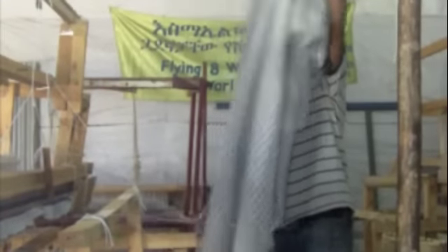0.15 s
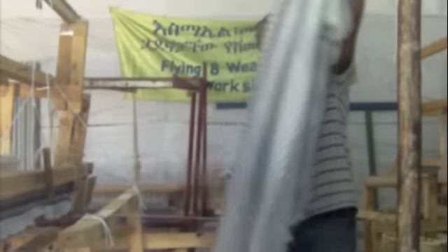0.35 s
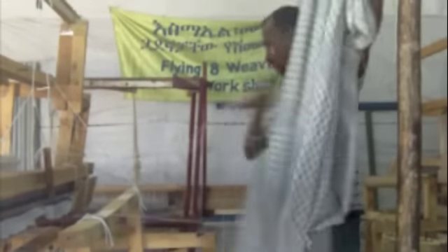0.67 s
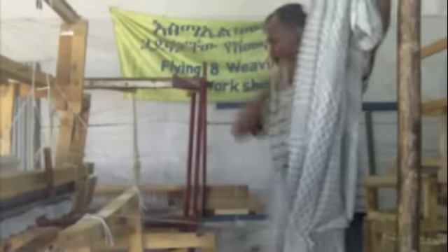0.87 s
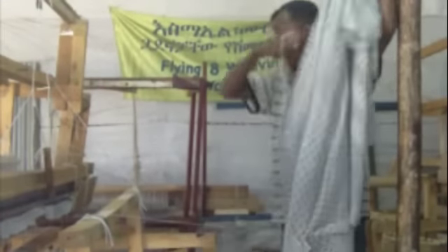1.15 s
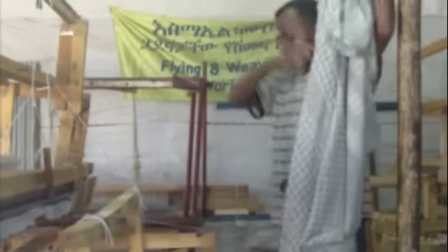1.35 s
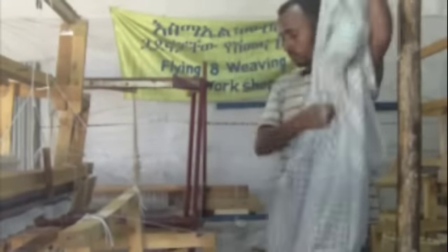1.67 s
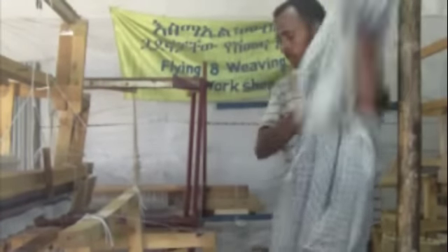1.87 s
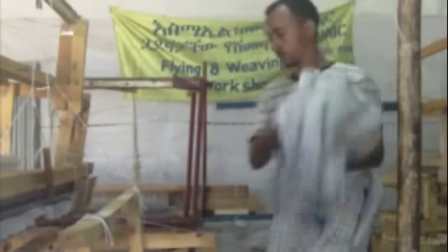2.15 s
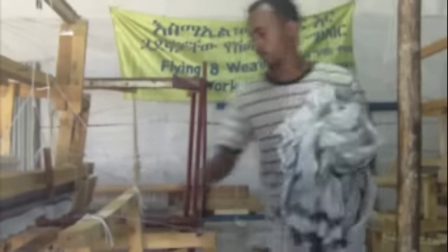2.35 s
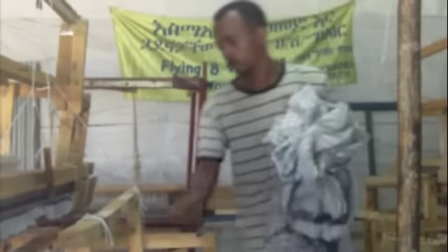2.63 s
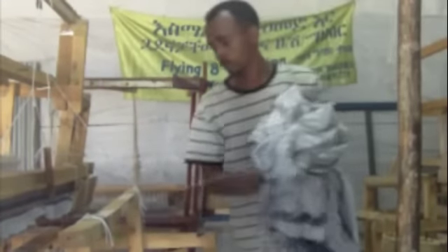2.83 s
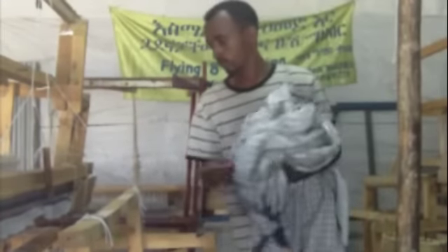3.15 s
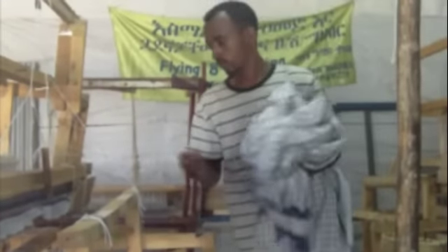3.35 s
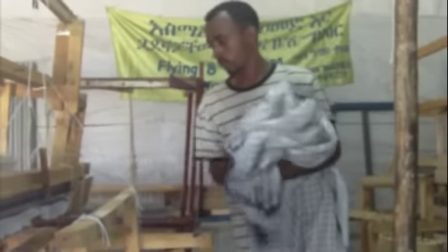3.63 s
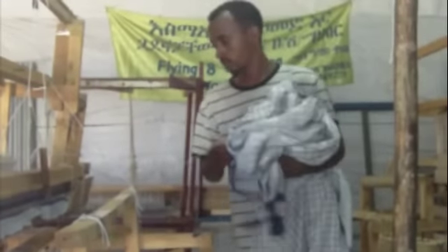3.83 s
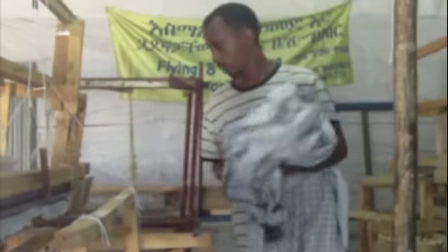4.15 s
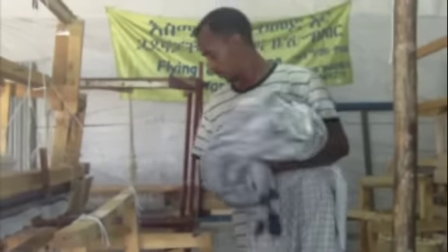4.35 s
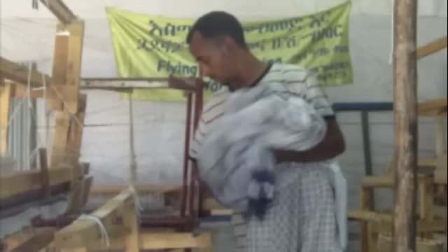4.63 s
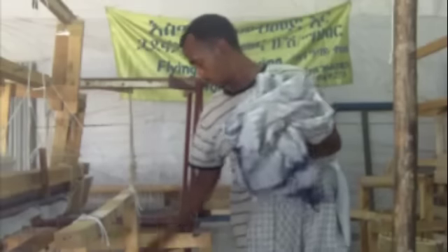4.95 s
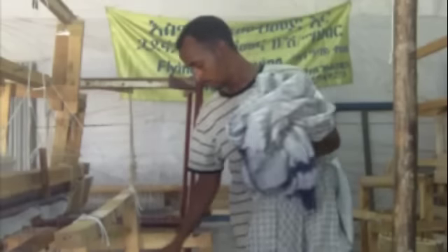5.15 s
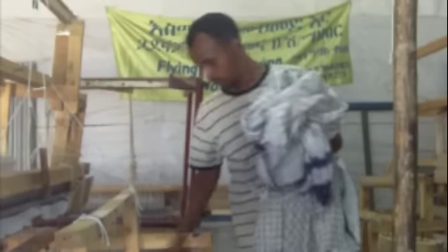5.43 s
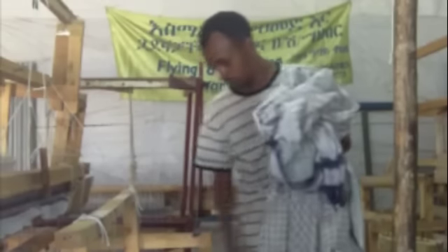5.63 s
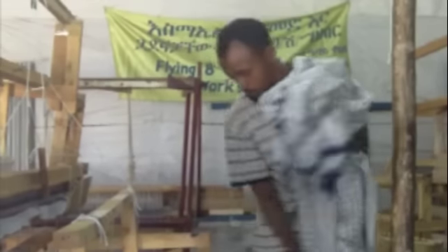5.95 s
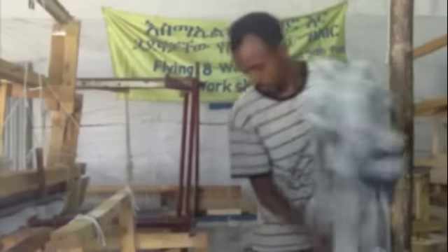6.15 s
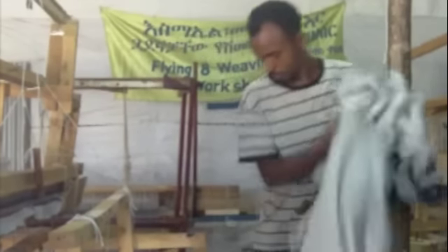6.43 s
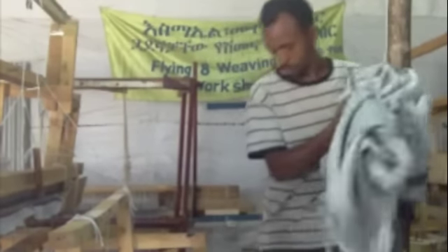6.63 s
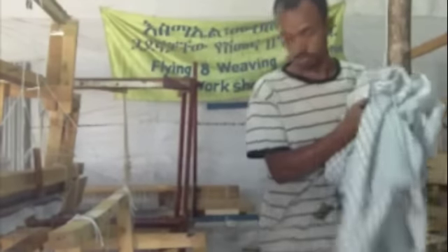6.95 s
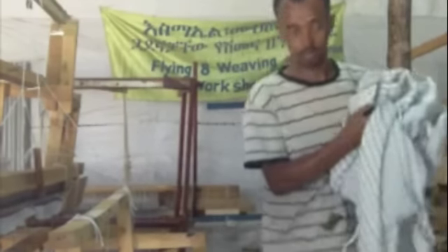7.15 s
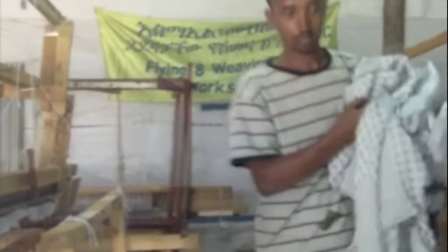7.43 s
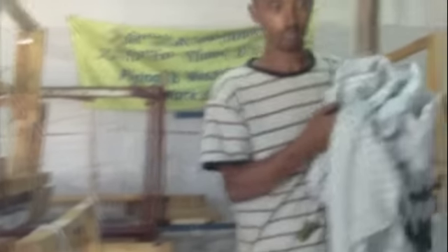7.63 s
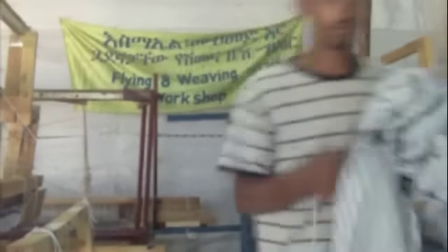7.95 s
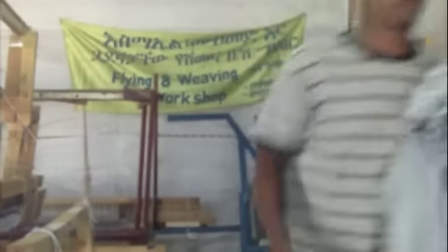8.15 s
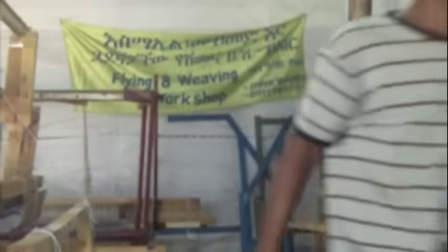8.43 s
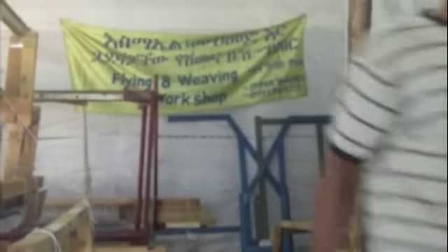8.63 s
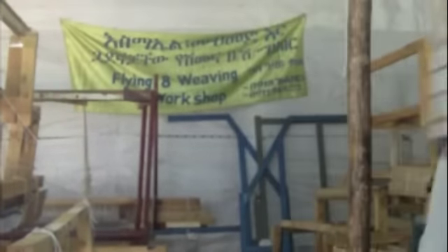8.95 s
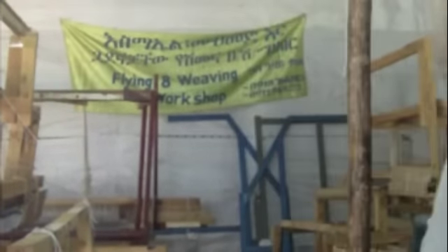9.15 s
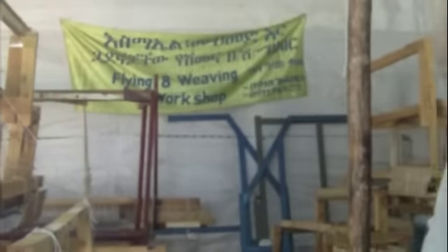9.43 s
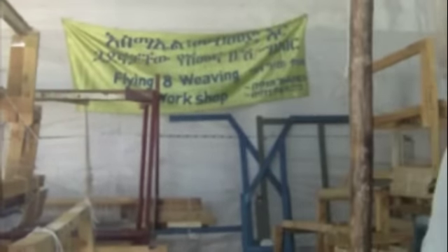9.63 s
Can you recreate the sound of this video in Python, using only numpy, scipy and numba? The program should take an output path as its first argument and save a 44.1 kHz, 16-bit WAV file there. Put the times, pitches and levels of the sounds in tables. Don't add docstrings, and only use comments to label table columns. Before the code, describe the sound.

Loud, dry mechanical clatter of a wooden loom: loose joints rumble, small wheels chatter, threads fizz and snap, small parts click and wires ring. Each pass begins with a knock and rattle, swells into a bright scraping hiss, then ends in a dull thump or a cracking clack, alternating. The rhythm dips briefly after every beat. Close stereo pickup with little bass, a short room echo and a faint distant murmur.

```python
import sys
import numpy as np
from scipy import signal
from scipy.fft import rfft, irfft, next_fast_len
from scipy.io import wavfile
from scipy.ndimage import uniform_filter1d
from numba import njit

SR = 44100
rng = np.random.default_rng(int(sys.argv[2]) if len(sys.argv) > 2 else 0)


def elevation(decibels):
    levels = np.asarray(decibels, float)
    return 10 ** (levels / 20)


def master(y):
    cut = np.clip(np.atleast_2d(y).T, -1, 1)
    pcm = np.round(cut * 32767)
    wavfile.write(sys.argv[1], SR, pcm.astype(np.int16))


N = 431298

# pitch_hz, level_db (per Hz)
TRACK_COLOUR = [(1100, -49), (1700, -8), (2500, 0), (3200, -1), (4200, -4), (5200, -17), (7000, -45)]
# pitch_hz, level_db (per Hz)
FRAME_COLOUR = [(59, -80), (100, -28), (290, -18.5), (399, -3.5), (785, 3), (909, 2), (1020, 4.5),
                (1590, 1.5), (2400, -13), (3120, -31), (5280, -120)]
# pitch_hz, level_db (per Hz)
REED_COLOUR = [(2500, -37), (4000, -2.5), (4800, 0), (5500, 6.5), (6800, -4), (7600, -8.5), (9500, -27.5)]
# pitch_hz, level_db (per Hz)
WARP_COLOUR = [(5000, -26), (7000, -3.5), (8600, -2), (10500, -5.5), (13000, -6.5), (15200, -5),
               (15700, -40)]
# pitch_hz, level_db (per Hz)
HALL_COLOUR = [(150, -3), (700, 6.5), (2000, 14.5), (5000, -12), (15500, -24)]
# pitch_hz, level_db (side against mid)
PORT_DIFFERENCE = [(60, -17), (110, -27), (200, -59), (380, -25), (700, -17.5), (1290, -46), (2380, -51),
                   (4400, -17.5), (8120, -5.5), (15000, -5.5)]

# pitch_hz, width_hz, level_db
SHUTTLE_RINGS = [(2130, 27, -3), (3140, 26, -10), (3700, 100, -0.5), (4033, 270, -1), (5030, 61, -3)]
# pitch_hz, width_hz, level_db
FRAME_RINGS = [(420, 58, -24), (730, 22, -12), (905, 50, 1.5), (1190, 19, -0.5), (1340, 17, -13)]
# pitch_hz, width_hz, level_db
REED_RINGS = [(4880, 71, 9.1), (5160, 40, 3.1), (6340, 440, 1.4)]
# pitch_hz, width_hz, level_db
HEDDLE_RINGS = [(1686, 12, -1), (2012, 14, -1), (2720, 20, -8), (4100, 50, -10)]

# hands_start_s, beat_start_s, fidget_db (in the pause that follows)
PICKS = [(-.04, 0.403, 6.5), (0.88, 1.302, 4.5), (1.802, 2.251, 6.5), (2.713, 3.151, 0),
         (3.636, 4.105, 11.5), (4.565, 4.992, 2.5), (5.473, 5.916, 11.5), (6.387, 6.8, 6),
         (7.285, 7.723, 12.5), (8.181, 8.608, -13.5), (9.082, 9.559, 17)]
# start_s, peak_db, pitch_hz
TREADLES = [(.054, -15.5, 750), (.957, -12, 1210), (1.894, -13.5, 800), (2.795, -12, 820),
            (3.748, -16, 880), (4.636, -12, 1250), (5.564, -11, 1050), (6.449, -12, 920),
            (7.377, -9.5, 1160), (8.262, -14, 900), (9.204, -17, 1090)]
# start_s, peak_db, pitch_hz
LANDINGS = [(.356, -12, 860), (1.237, -12, 980), (2.185, -16.5, 860), (3.088, -13, 1270),
            (4.037, -15.5, 1150), (4.927, -8.5, 1280), (5.843, -17, 1190), (6.745, -11, 1160),
            (7.665, -13, 902), (8.566, -22, 1200), (9.492, -27, 832)]
# start_s, peak_db, pitch_hz
HOMES = [(.676, -17.5, 600), (1.6022, -0.5, 3200), (2.53, -23, 900), (3.449, -0.5, 3080),
         (4.356, -20.5, 678), (5.273, -3.5, 3140), (6.183, -31, 400), (7.1006, -1.5, 3140),
         (7.984, -26, 452), (8.9114, -2.5, 3430), (9.82, -20, 500)]
# start_s, peak_db, pitch_hz
THROWS = [(.9233, -3, 4170), (1.8442, -8.5, 3130), (2.7422, -9, 2550), (3.474, -4, 3140),
          (3.6521, -11.5, 3160), (3.693, -7.5, 3520), (4.585, -7, 3740), (5.295, -9, 3140),
          (.2498, -12, 5210), (7.5687, -9, 5110), (5.1991, -17, 2010), (4.6159, -20, 5270),
          (6.4103, -7.5, 3800), (7.3013, -4.5, 3920), (8.0765, -8, 2060), (8.1623, -14, 2630),
          (8.1953, -14, 3560), (8.2212, -5, 3990), (9.1062, -11, 3700), (9.1466, -9, 3260)]
# start_s, peak_db
WHEEL_JUMPS = [(0.0485, -4.5), (0.9865, -7.5), (1.0224, -7.5), (1.0814, -12), (1.1438, -6.5),
               (1.2428, -6.5), (1.9809, -8), (2.8395, -5), (2.9761, -7.5), (3.7425, -8), (3.783, -17),
               (4.673, -5.5), (4.8305, -13), (4.9304, -6), (5.6388, -5.5), (5.672, -10), (5.88, -14),
               (6.4932, -9), (6.5814, -7), (7.4066, -11), (7.455, -10.5), (7.5665, -9), (8.2733, -11),
               (8.2945, -13), (8.3604, -16), (8.4397, -9), (9.2843, -6.5), (9.3497, -8)]
# start_s, peak_db, pitch_hz
CLICKS = [(.1446, -5, 4400), (.1945, -16, 4700), (.4733, -4, 6170), (1.3269, -12, 2670),
          (2.0687, -18, 4100), (2.1086, -12, 5060), (3.1832, -3, 5440), (3.8362, -6, 4400),
          (4.0397, -7, 5000), (3.5404, -10, 5460), (4.1495, -8, 5160), (4.7481, -9, 3910),
          (4.785, -6, 3150), (5.0265, -4, 6100), (5.8426, -12, 5200), (5.9888, -12, 6230),
          (6.8329, -7, 5130), (7.646, -7, 4200), (7.668, -14, 4970), (7.7214, -7, 4030),
          (7.7907, -11, 5300), (8.6318, -3, 6000), (9.6071, -12, 5210)]
# start_s, peak_db
SNAPS = [(0.0871, -8), (0.7316, -28), (0.8583, -18), (1.064, -16), (1.685, -13.5), (1.936, -17),
         (2.577, -16), (2.6902, -23), (2.8788, -6), (3.7982, -15), (4.4163, -13), (4.69, -11),
         (5.4778, -30), (5.7636, -16), (6.2396, -16), (6.2794, -22), (6.515, -13), (6.6155, -21),
         (7.4973, -16), (8.036, -19), (8.083, -8), (8.3199, -10), (8.5509, -19)]

HANDS_S, BEAT_S, FIDGET_DB = np.transpose(PICKS)
DOWN_S = np.array([row[0] for row in TREADLES])
LAND_S = np.array([row[0] for row in LANDINGS])
HOME_S = np.array([row[0] for row in HOMES])
LINGER_S = (0.018, 0.061)
BEAT_LIFT_S = (0.031, 0.051)
BEAT_RISE_S = (0.035, 0.019)
JAR_HOLD_S = (0.12, 0.088)
FLIGHT_LEAD_S, FLIGHT_OVERRUN_S = 0.045, 0.018


def shuttle(level_db):
    t, flying, travel = np.arange(N) / SR, np.zeros(N), np.zeros(N)
    starts = DOWN_S - FLIGHT_LEAD_S
    for start, length in zip(starts, LAND_S + FLIGHT_OVERRUN_S - starts):
        part = (t - start) / length
        inside = (part > 0) & (part < 1)
        flying[inside] = np.minimum(1, 23.0 * np.minimum(part, 1 - part))[inside]
        travel[inside] = part[inside] ** 2.2
    track_hz = 2450 + (2090 - 2450) * travel + 70 * drift(19.0)
    wheels = contacts(per_s=150, spread_db=3.0, rub_db=2.0)
    track = gliding(gliding(wheels, track_hz, 460.0, SR), track_hz, 460.0, SR)
    ringing = elevation(-3.2) * rms_one(track) + elevation(-2.5) * rms_one(modes(wheels, SHUTTLE_RINGS))
    rubbing = rms_one(colour(contacts(per_s=400, spread_db=0.0, rub_db=7.0), TRACK_COLOUR))
    loose_parts = flecks(700, 1476, 4510, cycles=32, spread_db=3.0, count=18)
    rattle = elevation(-1.0) * rubbing + elevation(-3.5) * loose_parts
    return elevation(level_db) * (flying * ringing + elevation(-5.0 * flying) * rattle)


def shuttle_effort():
    run = stroke(HANDS_S, HOME_S + out_back(LINGER_S), level_db=(-23.5, -20.5),
                 sag_db_per_s=3.2, attack_s=0.031, release_db_per_s=195)
    flight = stroke(DOWN_S - FLIGHT_LEAD_S, LAND_S + out_back((.13, 0.078)), level_db=(-20.5, -21.5),
                    sag_db_per_s=1.3, attack_s=0.031, release_db_per_s=155)
    return effort_db(run + flight, rest_db=-38)


def frame(level_db):
    shake = colour(contacts(per_s=300, spread_db=2.0, rub_db=5.0), FRAME_COLOUR)
    return elevation(level_db) * rms_one(shake + modes(shake, FRAME_RINGS))


def frame_effort():
    run = stroke(HANDS_S, HOME_S + out_back(LINGER_S), level_db=(-37, -34),
                 sag_db_per_s=-0.5, attack_s=0.018, release_db_per_s=140)
    wake = stroke(HANDS_S, DOWN_S, level_db=(-28.5, -29.5),
                  sag_db_per_s=16, attack_s=0.021, release_db_per_s=60)
    treadle = stroke(DOWN_S, DOWN_S + out_back((0.095, 0.044)), level_db=(-31, -30),
                     sag_db_per_s=23, attack_s=0.0078, release_db_per_s=63)
    jar = stroke(LAND_S, LAND_S + out_back(JAR_HOLD_S), level_db=(-24.5, -23),
                 sag_db_per_s=23, attack_s=0.0059, release_db_per_s=300)
    return effort_db(run + wake + treadle + jar, rest_db=-47)


def reed(level_db):
    hiss = colour(contacts(per_s=1400, spread_db=-2.5, rub_db=4.5), REED_COLOUR)
    hiss = elevation(-1.5) * rms_one(hiss + modes(hiss, REED_RINGS))
    plucks = elevation(-4.5) * flecks(900, 4533, 7025, cycles=104, spread_db=3.0, count=12)
    wire_push = elevation(uniform_filter1d(level_db, size=3000)) * rng.standard_normal(N)
    wires = modes(wire_push, HEDDLE_RINGS)
    return elevation(level_db) * (hiss + plucks) + elevation(17.5) * wires


def reed_effort():
    draw = stroke(HANDS_S, LAND_S, level_db=(-28.5, -25.5),
                  sag_db_per_s=(-15.5, -0.5), attack_s=0.022, release_db_per_s=94)
    beat = stroke(BEAT_S, HOME_S - out_back(BEAT_LIFT_S), level_db=(-16, -17),
                  sag_db_per_s=(17, 11), attack_s=BEAT_RISE_S, release_db_per_s=101)
    return effort_db(draw + beat, rest_db=-42)


def warp(level_db):
    fizz = rms_one(colour(contacts(per_s=2600, spread_db=-3.5, rub_db=10.5), WARP_COLOUR))
    twang = flecks(1200, 7510, 15140, cycles=200, spread_db=3.0, count=14)
    twang = rms_one(colour(twang, WARP_COLOUR))
    return elevation(level_db) * (fizz + elevation(-4.5) * twang)


def warp_effort():
    part = stroke(HANDS_S, BEAT_S, level_db=(-33.5, -29),
                  sag_db_per_s=(-10, 16), attack_s=0.021, release_db_per_s=60)
    tug = stroke(LAND_S, LAND_S + 0.065, level_db=(-33, -30.5),
                 sag_db_per_s=0, attack_s=0.0059, release_db_per_s=170)
    pack = stroke(BEAT_S, HOME_S - out_back(BEAT_LIFT_S), level_db=(-22, -22),
                  sag_db_per_s=(14, 14), attack_s=BEAT_RISE_S, release_db_per_s=93)
    return effort_db(part + tug + pack, rest_db=-46)


def knock_rows():
    bars = []
    for k, (down, land) in enumerate(zip(DOWN_S, LAND_S)):
        bars.append((down + (.042, -.062)[k % 2], (-18.5, -22.5)[k % 2], 915))
        bars.append((land - 0.074, -28, 915))
    kinds = (TREADLES, -21.5), (LANDINGS, -18.5), (HOMES[:-1:2], -4), (bars, -28)
    return [(*row, thud_db) for rows, thud_db in kinds for row in rows]


def clack_rows():
    jumps = [(s, peak_db, 2495 + 89 * rng.standard_normal()) for s, peak_db in WHEEL_JUMPS]
    snaps = [(s, peak_db - 4.5, 5000) for s, peak_db in SNAPS]
    kinds = (HOMES[1::2], -27), (THROWS, -15), (jumps, -25), (CLICKS, -19), (snaps, 9)
    return [(*row, crack_db) for rows, crack_db in kinds for row in rows]


def blows(rows, burst_t60_s, rise_s, q, tick_db, second_hz):
    out, t = np.zeros(N + SR), np.arange(int(.2 * SR)) / SR
    shape = elevation(-60 * t / burst_t60_s) * (1 - 0.86 * np.exp(-t / rise_s))
    band = signal.butter(2, second_hz, "band", fs=SR, output="sos")
    for s, peak_db, hz, second_db in rows:
        rattle, second = rng.standard_normal((2, len(t))) * shape
        rattle[0] = second[0] = elevation(tick_db)
        body = resonance(resonance(rattle, hz, hz / q), hz, hz / q)
        second = signal.sosfilt(band, second)
        blow = body / np.abs(body).max() + elevation(second_db) * second / np.abs(second).max()
        first = int(s * SR)
        out[first:first + len(t)] += elevation(peak_db) * blow
    return out[:N]


def pivot_and_bobbin():
    pivot = rising_scrape(LAND_S, LAND_S + out_back(JAR_HOLD_S), start_hz=900, end_hz=1730,
                          width_hz=340, level_db=(-29.5, -26.5))
    bobbin = rising_scrape(DOWN_S + 0.037, LAND_S, start_hz=4400, end_hz=5300,
                           width_hz=200, level_db=(-28.5, -35))
    return pivot + bobbin


def rising_scrape(starts, ends, start_hz, end_hz, width_hz, level_db):
    t = np.arange(N) / SR
    corners_hz = np.resize([start_hz, end_hz], 2 * len(starts))
    hz = np.interp(t, np.ravel([starts, ends], "F"), corners_hz)
    grit = contacts(per_s=250, spread_db=2.0, rub_db=-4.0)
    tone = rms_one(gliding(gliding(grit, hz, width_hz, SR), hz, width_hz, SR))
    power = stroke(starts, ends, level_db, sag_db_per_s=0, attack_s=0.043, release_db_per_s=300)
    return tone * np.interp(t, np.arange(len(power)) * 32 / SR, np.sqrt(power))


def far_looms():
    return elevation(-42) * rms_one(colour(rng.standard_normal(N), HALL_COLOUR))


def room_tail(t60_s, length_s):
    t = np.arange(int(length_s * SR)) / SR
    tail = rng.standard_normal(len(t)) * elevation(-60 * t / t60_s)
    return tail / np.sqrt(np.sum(tail ** 2))


def out_back(pair):
    return np.resize(pair, len(PICKS))


def stroke(starts, ends, level_db, sag_db_per_s, attack_s, release_db_per_s):
    t, out = np.arange(0, N, 32) / SR, 0
    for k, (start, end) in enumerate(zip(starts, ends)):
        level, sag, attack = (np.resize(v, 2)[k % 2] for v in (level_db, sag_db_per_s, attack_s))
        held = np.clip(t - start - attack, 0, max(end - start - attack, 0))
        rise = np.clip((t - start) / attack, 0, 1)
        fall_db = release_db_per_s * np.maximum(t - end, 0)
        out = out + (rise * elevation(level - sag * held - fall_db)) ** 2
    return out


def effort_db(power, rest_db):
    t = np.arange(0, N, 32) / SR
    stir = stroke(HANDS_S - 0.046, HANDS_S, level_db=5, sag_db_per_s=0, attack_s=0.046, release_db_per_s=150)
    fidget = elevation(2 * np.interp(t, HOME_S + 0.088, FIDGET_DB)) * (1 + stir)
    return np.interp(np.arange(N) / SR, t, 10 * np.log10(power + elevation(2 * rest_db) * fidget))


def jolt(rows, decay_s):
    kicks = np.zeros(N)
    kicks[[int(row[0] * SR) for row in rows]] = 1
    return np.minimum(1, signal.lfilter([1], [1, -np.exp(-1 / (decay_s * SR))], kicks))


def contacts(per_s, spread_db, rub_db):
    sizes = elevation(spread_db * np.minimum(rng.exponential(1, N), 4)) * rng.choice([-1, 1], N)
    clicks = sizes * (rng.random(N) < per_s / SR)
    return rms_one(clicks) + elevation(rub_db) * rng.standard_normal(N)


def flecks(per_s, low_hz, high_hz, cycles, spread_db, count):
    clicks = contacts(per_s, spread_db, rub_db=-36)
    dealt = rng.integers(0, count, N)
    pitches = np.geomspace(low_hz, high_hz, count) * rng.uniform(0.93, 1.02, count)
    out = np.zeros(N)
    for k, hz in enumerate(pitches):
        out += resonance(clicks * (dealt == k), hz, 2.2 * hz / cycles) * np.sqrt(cycles / hz)
    return rms_one(out)


def drift(rate):
    r = np.exp(-80 * np.pi * rate / SR)
    noise = rng.standard_normal(N // 40 + 2002)
    slow = signal.lfilter([1], [1, -2 * r, r * r], noise)[2000:]
    return np.interp(np.arange(N) / 40, np.arange(len(slow)), rms_one(slow))


def rms_one(x):
    return x / np.sqrt(np.mean(x ** 2) + 1e-20)


def colour(x, points):
    hz, level_db = np.transpose(points)
    size = next_fast_len(len(x))
    bins = np.maximum(np.arange(size // 2 + 1) * SR / size, 1)
    gain = elevation(np.interp(np.log(bins), np.log(hz), level_db))
    return irfft(rfft(x, size) * gain, size)[:len(x)]


def resonance(x, hz, width_hz):
    r = np.exp(-np.pi * width_hz / SR)
    feedback = [1, -2 * r * np.cos(2 * np.pi * hz / SR), r * r]
    return signal.lfilter(np.array([1, 0, -1]) * (1 - r * r) / 2, feedback, x)


def modes(x, table):
    return sum(elevation(level_db) * resonance(x, hz, width_hz) for hz, width_hz, level_db in table)


@njit
def gliding(x, hz, width_hz, sr):
    r, out = np.exp(-np.pi * width_hz / sr), np.zeros(len(x))
    for i in range(2, len(x)):
        push = (1 - r * r) / 2 * (x[i] - x[i - 2])
        out[i] = push + 2 * r * np.cos(2 * np.pi * hz[i] / sr) * out[i - 1] - r * r * out[i - 2]
    return out


def scene():
    dull, bright = knock_rows(), clack_rows()
    clack_jolt, knock_jolt = jolt(bright, decay_s=.016), jolt(dull, decay_s=.05)
    loom = shuttle(shuttle_effort() - 2.5 + 2.5 * clack_jolt + 1.46 * drift(15.3))
    loom = loom + frame(frame_effort() - 3.0 + 4.8 * knock_jolt + 1.5 * drift(9.4))
    loom = loom + reed(reed_effort() - 1.8 + 4.5 * clack_jolt + .9 * drift(25))
    loom = loom + warp(warp_effort() - 2.2 + 5.5 * clack_jolt + .8 * drift(20))
    loom = loom * elevation(1.6 * drift(21))
    knocks = blows(dull, burst_t60_s=0.077, rise_s=0.001, q=0.87, tick_db=13, second_hz=[300, 540])
    clacks = blows(bright, burst_t60_s=0.065, rise_s=0.0014, q=3.5, tick_db=16, second_hz=[5000, 15000])
    hits = knocks + clacks
    hits = hits + elevation(-9) * signal.fftconvolve(hits, room_tail(t60_s=.3, length_s=.4))[:N]
    mid = loom + pivot_and_bobbin() + hits + far_looms()
    paths = [drift(40) * signal.fftconvolve(mid, room_tail(0.03, .02))[:N] for path in range(3)]
    scattered = sum(paths) / np.sqrt(3)
    treble = signal.butter(3, 7000, "high", fs=SR, output="sos")
    lean = elevation(-13) * signal.sosfiltfilt(treble, mid)
    side = colour(scattered, PORT_DIFFERENCE) - lean - 0.029 * mid
    return np.array([mid + side, mid - side])


def low_pass(x):
    return signal.sosfilt(signal.butter(12, 16490, fs=SR, output="sos"), x)


def record(dry):
    dipped = dry - .75 * np.array([resonance(x, 7950, 130) for x in dry])
    rounded = .88 * np.tanh(dipped / .88)
    bass_cut = signal.butter(2, 330, "high", fs=SR, output="sos")
    top_cut = signal.cheby2(14, 60, 15800, fs=SR, output="sos")
    mix = signal.sosfilt(np.vstack([bass_cut, top_cut]), rounded)
    return low_pass(mix)


dry = scene()
out = record(dry)
master(out)
```